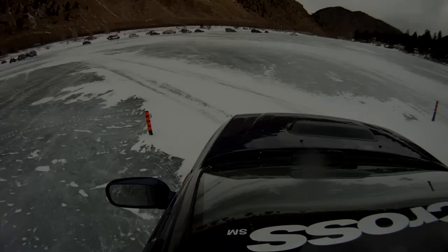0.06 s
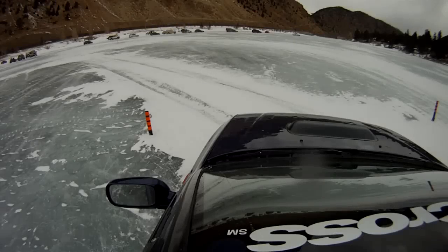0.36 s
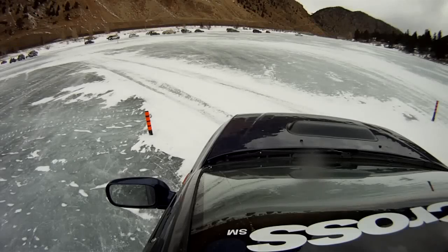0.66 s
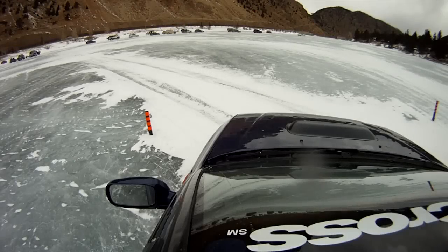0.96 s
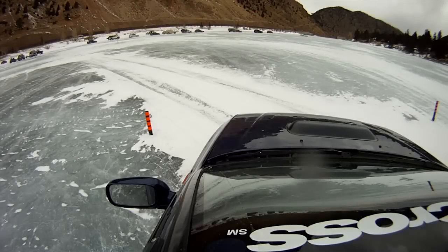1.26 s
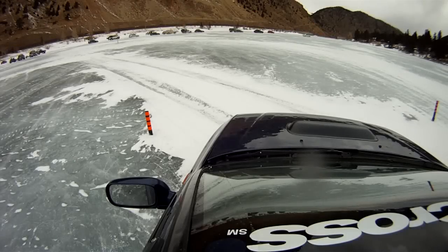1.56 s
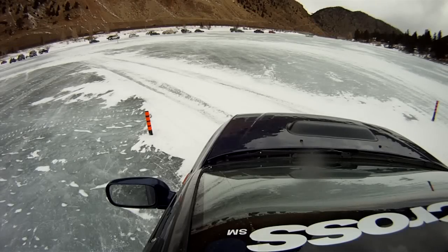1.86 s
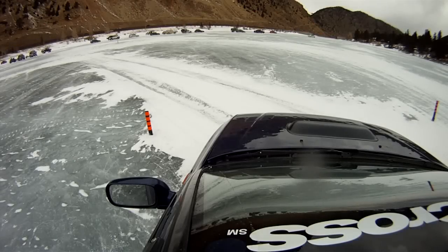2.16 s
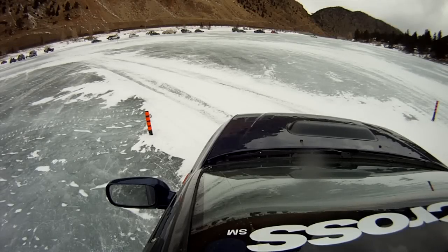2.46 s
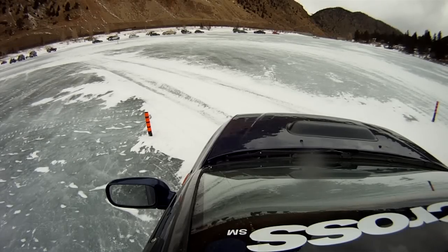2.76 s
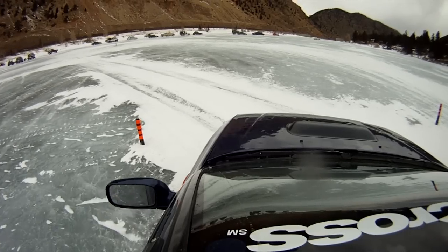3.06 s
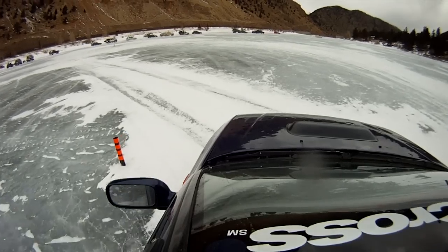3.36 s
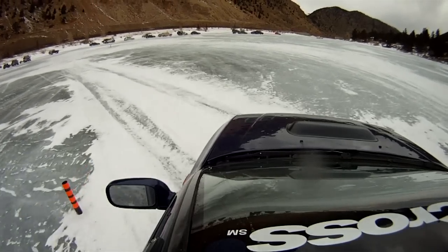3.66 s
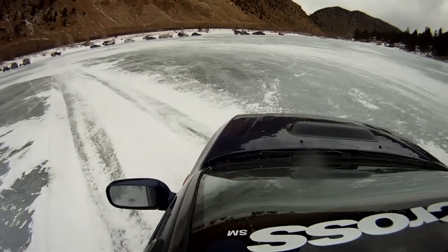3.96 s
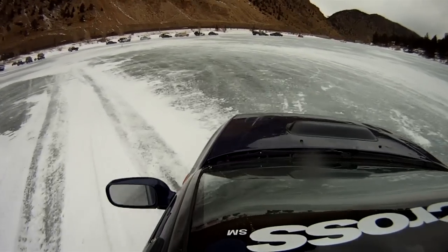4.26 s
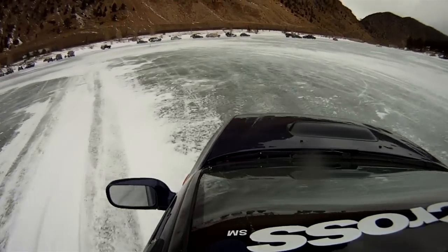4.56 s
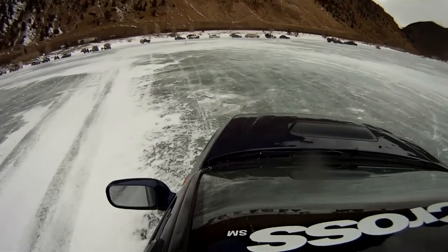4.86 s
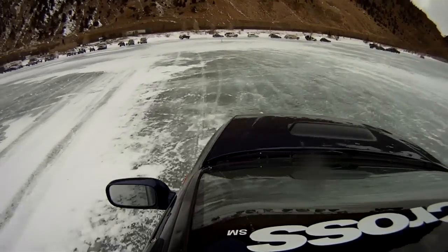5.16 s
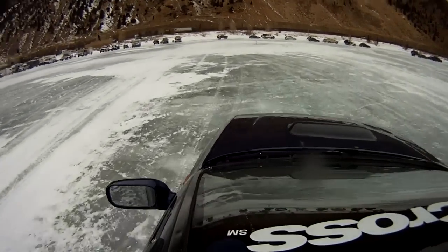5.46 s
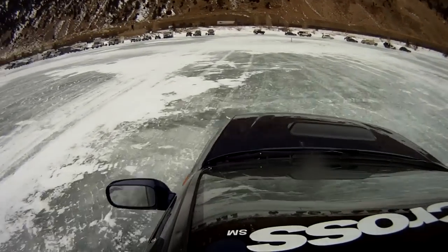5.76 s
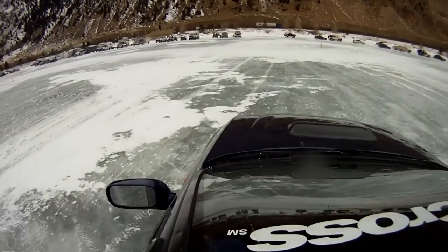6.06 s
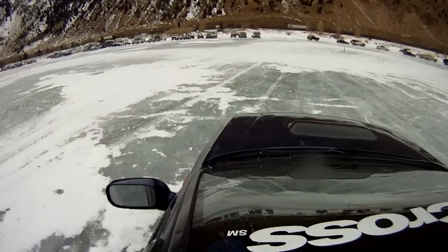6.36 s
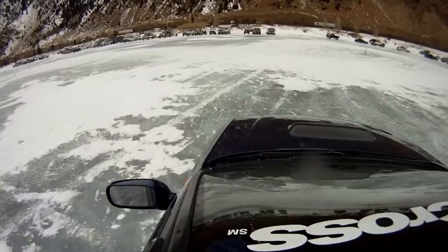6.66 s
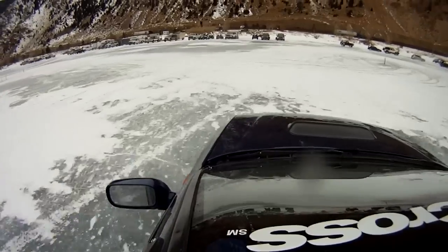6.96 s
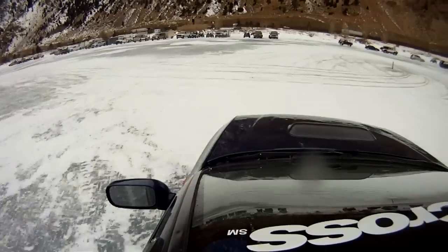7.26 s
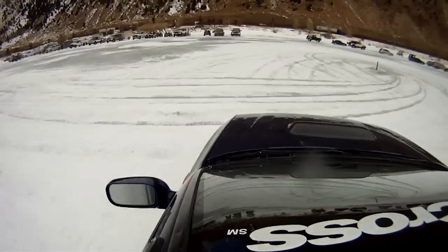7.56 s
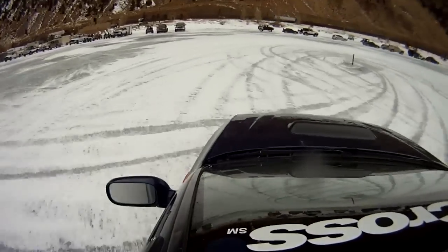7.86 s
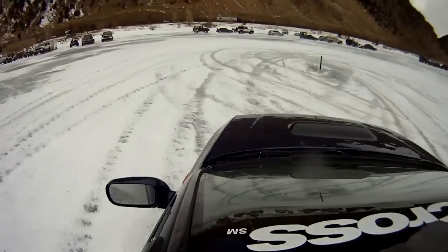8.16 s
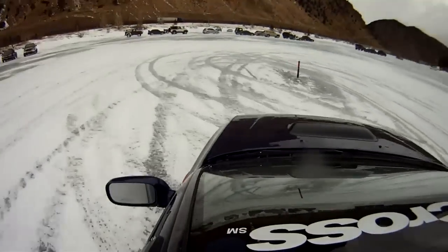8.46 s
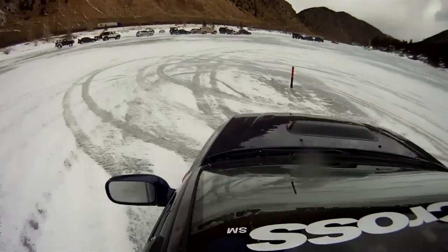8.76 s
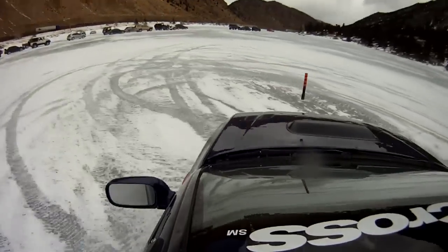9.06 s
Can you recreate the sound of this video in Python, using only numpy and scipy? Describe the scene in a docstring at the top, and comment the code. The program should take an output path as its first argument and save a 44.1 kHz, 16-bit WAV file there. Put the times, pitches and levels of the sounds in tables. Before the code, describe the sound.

A car idles with a quiet low hum, faint hiss and very faint high chirps, with a dab of throttle at about 0.7 seconds. From 2 seconds the revs climb, and near 2.7 the car pulls away, much louder, with deep rumble, drumming body panels and wheel thuds around 3 seconds. Tyres hiss and crunch over ice. The engine growls, changes up at about 5.5 seconds and pulls again around 7. Between 3.5 and 7.5 seconds the sliding tyres rasp and give several short, wavering squeals. The microphone is in a loose plastic case mounted outside the car, which adds a buzzing chatter, patchy from 3 seconds and continuous from 5, with a thin high sizzle. Sharp plastic knocks come at 6.5 seconds and hardest at 7.8, followed by a run of lighter clacks as the car rumbles on over rutted snow until about 9.3 seconds.

```python
"""A car idles on a frozen lake, pulls away, changes up and drifts over ice and rutted snow.
Its engine hums in orders of the crankshaft, the body panels drum and the wheels thud over humps.
The tyres hiss and crunch as they roll, and scrape and squeal as they slip. It is all heard from a
plastic case on an arm outside the car: the arm sways with a deep rumble, and the loose case
chatters at each swing and knocks on the ruts."""
import sys
import numpy as np
from scipy import signal
from scipy.fft import rfft, irfft, next_fast_len
from scipy.io import wavfile
from scipy.ndimage import uniform_filter1d

SR = 44100
rng = np.random.default_rng(int(sys.argv[2]) if len(sys.argv) > 2 else 0)


def wav_out(sig):
    """Save sig, one row per channel (or a flat mono array), as 16-bit PCM at SR to the path in sys.argv[1]."""
    wavfile.write(sys.argv[1], SR, np.round(np.clip(np.atleast_2d(sig).T, -1, 1) * 32767).astype(np.int16))


N = 410571
TIME = np.arange(N) / SR
CREEP_S, CREEP_RISE_S = 2.01, 0.98  # the car starts to roll
LAUNCH_S, LAUNCH_RISE_S = 2.703, 0.3  # the tyres bite and it lurches away


# Rev curve: time_s, crankshaft_hz
REVS = [(0, 23.8), (.45, 23.9), (.7, 32), (1.65, 21.3), (2.2, 35.3), (2.8, 41.5), (3.3, 36.97),
        (3.7, 38.66), (4.05, 35.51), (4.5, 35.3), (4.85, 36.6), (5.35, 40.4), (5.55, 33.4), (5.9, 34.75),
        (6.72, 44.2), (7.33, 44.3), (8.3, 38), (9.31, 43.2)]
# Engine tone in each gear: crankshaft_multiple, low_gear_db, next_gear_db
ENGINE_ORDERS = [(2, -36, -42), (3, -42, -36), (4, -37.5, -34), (5, -63, -46), (6, -42.5, -72),
                 (8, -44, -58), (10, -56.5, -62), (12, -53, -70.5), (13, -49, -85), (14, -80, -84),
                 (15, -55, -79), (16, -53.5, -58), (17, -58, -59), (20, -58, -66), (21, -60, -55.5),
                 (24, -86, -56.5), (28, -64.5, -53), (29, -78, -49), (33, -70, -55), (34, -70, -51),
                 (40, -55, -68)]
# One pull under throttle per gear: middle_s, length_s, engine_boost_db, extra_growl_db
PULLS = [(4.55, 2.76, 3, 13), (7.03, 2.1, 3.5, 12)]

def engine(blip_db, shift_s=5.45, coasting_db=-9):
    """Four cylinders through the body: orders of an unsteady crankshaft, recoloured by the gear."""
    crank_hz, = curves(REVS)
    pull_db, growl_db = swells(PULLS)
    crank_angle = 2 * np.pi * np.cumsum(crank_hz * (1 + .004 * walk(25))) / SR
    next_gear = ramp(shift_s - .05, .1)
    load = undb(coasting_db + growl_db)
    hum = np.zeros(N)
    for multiple, low_db, next_db in ENGINE_ORDERS:
        strength = undb(low_db) * (1 - next_gear) + undb(next_db) * next_gear
        if multiple > 5:  # growl and whine rise with load
            strength *= load
        flutter = 1 + 0.3 * walk(36)
        hum += strength * flutter * np.sin(round(multiple) * crank_angle + 2 * np.pi * rng.random())
    level_db = creeping(idle_db=-33, drive_db=-5) + pull_db + 1.5 * blip_db
    return np.sqrt(2) * hum * undb(level_db)


# Boom of the car body: frequency_hz, gain_db
PANEL_EQ = [(40, -29), (65, -8), (98, -7.5), (117, 1), (131, 5.5), (143, 2), (160, -16.5), (193, 1),
            (232, -2), (258, -14), (300, -26.5), (380, -31.5), (700, -59.5)]

def panels(drum_db):
    """Road and engine drum the body panels in two broad resonances."""
    return even(colour(noise(), PANEL_EQ), span_s=0.1) * undb(drum_db)


# Sub-bass jolts from the ground: frequency_hz, gain_db
JOLT_EQ = [(12, -36), (22, -7.5), (33, 11), (44, 7), (58, 3), (75, -2.5), (100, -20), (170, -54)]

def arm(rock_db, resonance_hz=31.2, lead_s=0.026, growth_db_per_s=0.47):
    """The mounting arm swings near its slow resonance, pushed out of step by jolts from the ground."""
    swing_hz = resonance_hz * (1 + .09 * walk(16))
    swing = np.sqrt(2) * np.sin(2 * np.pi * np.cumsum(swing_hz) / SR) * (1 + 0.55 * walk(27))
    rolling = .25 + 0.715 * ramp(LAUNCH_S, LAUNCH_RISE_S)
    jolts = rolling * unit(colour(noise(), JOLT_EQ))
    early_rock_db = np.interp(TIME + lead_s, TIME, rock_db)  # the arm rocks before the panels answer
    sway_db = launching(idle_db=-43.5, drive_db=-19 + growth_db_per_s * (TIME - LAUNCH_S))
    return even(swing + jolts, span_s=0.13) * undb(sway_db + early_rock_db)


def suspension(jolt_db):
    """The wheels thud as they take up the drive and drop into ruts."""
    thuds = colour(noise(), [(35, -25), (55, 5), (75, -3), (95, -1.5), (140, -34.5), (400, -65)])
    return even(thuds, span_s=0.13) * undb(launching(idle_db=-52.5, drive_db=-32.5) + jolt_db)


# Hardest hits of the case on its mount: start_s, level_db
KNOCKS = [(3.060, -22), (3.366, -21.5), (4.847, -24.5), (5.404, -20), (5.903, -29), (6.508, -11.5),
          (6.535, -13.5), (6.604, -17.5), (6.639, -23.5), (7.793, -2.5), (7.830, -19.5), (7.866, -24),
          (7.899, -18.5), (7.967, -13), (8.000, -10.5), (8.031, -18.5), (8.063, -20.5), (8.112, -21),
          (8.260, -22.5), (8.406, -20), (8.429, -18), (8.442, -17.5), (8.480, -23), (8.568, -24),
          (8.737, -22), (8.762, -16.5), (8.910, -23.5), (9.113, -18.5), (9.141, -20)]
# Plastic ring of the case: pitch_hz, level_db, t60_s
CASE_MODES = [(747, -6.5, 0.16), (882, -3.5, 0.096), (1040, -36, 0.017), (1260, 8, 0.071),
              (1624, 11, 0.027), (1903, 9.5, 0.013), (2310, -1.5, 0.025), (2640, -10.5, 0.033),
              (3500, -12, 0.017), (5060, -15, 0.0017)]
# What the small shell radiates of a knock: frequency_hz, gain_db
SHELL_EQ = [(250, -14), (480, -19), (720, -2), (1250, -4), (1650, 0.5), (1900, -4), (2650, 4), (3500, 1.5),
            (4200, -4.5), (7500, -7.5), (10000, -1), (11700, -7), (12600, -7), (13500, -5)]

def knocks(taps_from_s=5.8, tap_db=-28, trim_db=-17):
    """Ruts slam the case on its mount: brief contacts ring its modes under a sharp crack."""
    t = np.arange(int(.06 * SR)) / SR
    hits = np.zeros(N + len(t))
    # lighter taps come by chance once the car is fast
    taps = [(taps_from_s + when * (TIME[-1] - taps_from_s), tap_db + 2 * force)
            for when, force in rng.random(size=(9, 2))]
    for start_s, level_db in taps + list(KNOCKS):
        modes = np.zeros(len(t))
        for hz, db, t60_s in CASE_MODES:
            detune, spread = rng.standard_normal(2)
            decay = undb(db + 1.5 * spread - 60 * t / t60_s)
            modes += decay * np.sin(2 * np.pi * hz * (1 + 0.02 * detune) * t)
        contacts = .2 * rng.standard_normal(len(t)) * np.exp(-t / .0023)
        contacts[0] = 1  # one firm blow, then a brief scuffing
        ring = unit(signal.fftconvolve(modes, contacts)[:len(t)] * np.exp(-t / .014))
        crack = unit(rng.standard_normal(len(t)) * np.exp(-t / .0038))
        start = int(start_s * SR)
        hits[start:start + len(t)] += undb(level_db + trim_db) * (ring + undb(-7) * crack)
    return colour(hits[:N], SHELL_EQ)


# Rough patches that rattle the case: middle_s, length_s, level_db
ROUGH_PATCHES = [(2.953, 0.047, -46), (3.113, 0.21, -43.5), (3.382, 0.071, -44), (3.489, 0.077, -46),
                 (3.79, 0.19, -40), (3.923, 0.12, -42), (4.195, 0.059, -40), (4.479, .09, -39),
                 (4.61, 0.093, -42.5), (4.852, .16, -42), (5.32, .4, -47)]

def rough_ground(fast_from_s=4.95, fast_db=-44.5, smooth_ice_db=-65.5):
    """How hard the ground rattles the case: single patches at first, then all the time, in clumps."""
    clumps_db = 2.5 * np.clip(walk(17), -2, 1)
    at_speed = ramp(fast_from_s, 0.081) * undb(fast_db + clumps_db - 1.5 * on_snow())
    smooth_ice = ramp(LAUNCH_S, LAUNCH_RISE_S) * undb(smooth_ice_db)
    return np.hypot(bursts(ROUGH_PATCHES), at_speed) + smooth_ice


# Bright plastic buzz: frequency_hz, gain_db
CHATTER_EQ = [(400, -29), (900, -4), (1700, 22.5), (2600, 15), (3500, 14), (5000, 11.5), (8000, 9),
              (15000, -8.5)]

def chatter(shake):
    """At each end of a swing the loose case rubs its seat and buzzes for a few milliseconds."""
    swing = np.abs(even(shake, span_s=0.61))
    ends = signal.find_peaks(swing, distance=int(.011 * SR))[0]
    slaps = np.zeros(N)
    slaps[ends] = np.clip(swing[ends] - .7, 0, 1.5) * undb(2 * rng.standard_normal(len(ends)))
    t = np.arange(int(.02 * SR)) / SR
    contact = signal.fftconvolve(slaps, t * np.exp(-t / .0013))[:N]
    return unit(colour(contact * noise(), CHATTER_EQ))


# Rolling tread: frequency_hz, gain_db
TYRE_EQ = [(200, 2), (400, -5.5), (520, 0.5), (620, -7.5), (850, -2.5), (980, -6), (1270, 2.5), (1500, 0),
           (2000, -3.5), (2650, -8.5), (3100, -16), (4200, -21.5), (7500, -33), (15000, -44)]

def tyres(idle_db=-51, drive_db=-39, snow_db=-3):
    """Tread hisses over ice, with snow grains cracking under it; a faint rush remains at idle."""
    speed = ramp(CREEP_S, CREEP_RISE_S) ** 1.94
    rolling = 0.18 + 0.73 * speed
    hiss = noise() * undb(4.5 * rolling * walk(45))
    crunch = rolling * unit(grains(900, spread_db=5.5))
    level_db = idle_db + (drive_db - idle_db) * speed + snow_db * on_snow()
    waver_db = 1.284 * rolling * walk(7)
    return unit(colour(hiss + undb(-2.5) * crunch, TYRE_EQ)) * undb(level_db + waver_db)


# Wheelspins and slides: middle_s, length_s, level_db
SCRAPES = [(0.696, 0.089, -53), (3.334, 0.42, -50), (3.632, 0.49, -39.5), (4.722, 0.32, -39),
           (5.265, 0.62, -40), (6.2, 0.39, -41.5), (6.838, 0.27, -52), (7.35, 0.14, -34)]
# Rasp of tread on ice: frequency_hz, gain_db
SCRAPE_EQ = [(300, -2), (700, -2), (1000, -1), (1350, 5.5), (1800, -2.5), (2400, -5), (3500, -8.5),
             (4500, -16.5), (15000, -15)]

def scrapes():
    """Slipping tread rasps over the ice, grain by grain."""
    rasp = noise() * undb(3 * walk(110)) + unit(grains(1500, spread_db=5))
    return unit(colour(rasp, SCRAPE_EQ)) * bursts(SCRAPES)


# Short squeals of rubber on ice: middle_s, length_s, pitch_hz, level_db
SQUEALS = [(3.703, 0.17, 1270, -39.5), (4.337, 0.17, 1332, -41), (4.716, 0.39, 2053, -38.5),
           (5.178, 0.089, 1274, -34), (5.6, 0.33, 1474, -38.5), (6.83, 0.36, 1510, -37.5),
           (7.301, .5, 1090, -41.5)]

def squeals():
    """Slipping tread sings briefly, with a wavering, grainy tone."""
    tones = np.zeros(N)
    for middle_s, length_s, hz, db in SQUEALS:
        phase = 2 * np.pi * np.cumsum(hz * (1 + 0.032 * walk(170))) / SR
        tones += undb(db) * swell(middle_s, length_s) * (1 + 0.36 * walk(60)) * np.sin(phase)
    return tones


# Soft snow between stretches of bare ice: start_s, end_s
SNOW_STRETCHES = [(3.75, 3.84), (7.45, 9.31)]

def on_snow(edge_s=0.13):
    """The ground under the tyres: 0 on ice, fading towards 1 on snow."""
    return sum(ramp(start_s, edge_s) - ramp(end_s, edge_s) for start_s, end_s in SNOW_STRETCHES)


# Thin high sizzle: frequency_hz, gain_db
SIZZLE_EQ = [(5000, -30), (8300, -17), (9700, 0), (11600, -1), (11780, 15), (12200, 15), (12380, -2),
             (14000, -1), (15300, -10)]

def sizzle(drum_db):
    """A thin high sizzle with a bright band near 12 kHz, following the drumming's level."""
    return unit(colour(noise() * undb(3.2 * walk(70)), SIZZLE_EQ)) * undb(drum_db - 24.5)


# Faint chirps at idle: pitch_hz, level_db
CHIRPS = [(3570, -74), (8450, -73.5)]

def idle_chirps(fade_from_s=1.5):
    """On-and-off chirping while the car stands, perhaps a belt."""
    gate = np.clip(walk(22.2) + .5, 0, 2) * (1 - ramp(fade_from_s, 0.31))
    return gate * sum(undb(db) * np.sin(2 * np.pi * np.cumsum(hz + 110 * walk(400)) / SR)
                      for hz, db in CHIRPS)


def idle_tick():
    """One small dry tick before the car moves."""
    bright = unit(colour(noise(), [(2000, -28), (3300, 4), (8000, -8), (11000, -20)]))
    return bright * swell(middle_s=1.64, length_s=.008) * undb(-54)


def air():
    """Steady faint hiss under everything."""
    eq = [(300, 8.5), (800, 19), (2500, -20.5), (3500, 3.5), (4300, -3), (9000, -3), (15000, -2.5)]
    return unit(colour(noise(), eq)) * undb(-59.5)


def stereo_width(roughness):
    """Faint, uneven left-right noise that swells with the chatter, over a thin steady hiss."""
    width_eq = [(30, 6.5), (200, 4), (500, 12), (900, 7), (1500, -7.5), (5000, -13.5), (15000, -29)]
    uneven = noise() * undb(10 * np.clip(walk(12), -2, 1))
    swelling = roughness * unit(colour(uneven, width_eq))
    thin_hiss = unit(colour(noise(), [(1500, -14), (3500, 0), (7000, -4), (10000, -26)]))
    return swelling * undb(-14.5) + thin_hiss * undb(-85.5)


def undb(db):
    """Decibels to gain."""
    return 10 ** (np.asarray(db) / 20)


def unit(x):
    """Scale to rms 1."""
    return x / np.sqrt(np.mean(x ** 2))


def even(x, span_s):
    """Hold a vibration near rms 1 over spans longer than span_s."""
    return x / np.sqrt(uniform_filter1d(x ** 2, int(span_s * SR) + 1) + 1e-9)


def colour(x, eq):
    """Minimum-phase EQ through (frequency_hz, gain_db) points."""
    size = next_fast_len(2 * len(x))
    hz, db = np.transpose(eq)
    log_hz = np.log(np.fft.rfftfreq(size, 1 / SR) + 1)
    log_gain = np.log(undb(np.interp(log_hz, np.log(hz), db)))
    cepstrum = irfft(log_gain, size)
    cepstrum[1:size // 2] *= 2  # folding the cepstrum makes the filter causal
    cepstrum[size // 2 + 1:] = 0
    return irfft(rfft(x, size) * np.exp(rfft(cepstrum)), size)[:len(x)]


def noise():
    """White noise of rms 1."""
    return rng.standard_normal(N)


def walk(rate_hz):
    """Random drift of spread near 1, gliding to rate_hz new values a second."""
    knots = rng.standard_normal(4096)
    return np.interp(TIME * rate_hz, np.arange(len(knots)), knots)


def grains(rate_hz, spread_db):
    """Random clicks of widely differing size."""
    clicks = (rng.random(N) < rate_hz / SR) * np.sign(noise())
    return clicks * undb(spread_db * np.clip(noise(), -2, 2))


def curves(table):
    """Every column of a timed table, sample by sample."""
    time_s, *columns = np.transpose(table)
    return [np.interp(TIME, time_s, column) for column in columns]


def ramp(start_s, length_s):
    """A straight rise from 0 to 1."""
    return np.clip((TIME - start_s) / length_s, 0, 1)


def swell(middle_s, length_s):
    """A rounded rise to 1 and back."""
    return np.sin(np.pi * np.clip((TIME - middle_s) / length_s + .5, 0, 1))


def swells(table):
    """Summed swells from rows of (middle_s, length_s, sizes), one curve per column of sizes."""
    return sum(np.outer(sizes, swell(middle_s, length_s)) for middle_s, length_s, *sizes in table)


def bursts(table):
    """A gain envelope from rows of (middle_s, length_s, level_db)."""
    return sum(undb(db) * swell(middle_s, length_s) for middle_s, length_s, db in table)


def creeping(idle_db, drive_db):
    """A level that climbs gradually as the car starts to roll."""
    return idle_db + (drive_db - idle_db) * ramp(CREEP_S, CREEP_RISE_S)


def launching(idle_db, drive_db):
    """A level that jumps as the tyres bite."""
    return idle_db + (drive_db - idle_db) * ramp(LAUNCH_S, LAUNCH_RISE_S)


# Dabs of throttle, the last at the launch: middle_s, length_s, drum_boost_db, sway_boost_db
THROTTLE_BLIPS = [(.7, 0.41, 8.5, 13.5), (1.88, 0.58, 7, 2.5), (2.42, 0.51, 3.5, 4), (2.93, 0.18, 1, 7)]
# Humps under the wheels: middle_s, length_s, drum_change_db, thud_change_db
HUMPS = [(3.06, 0.46, 1, 14), (3.36, 0.24, 2, 9.5), (4.67, 0.28, 4, -5), (5.21, 0.2, 8, 3),
         (5.55, 0.28, 4, 8), (6.15, 0.24, -3.5, 8.5), (6.48, 0.15, -1, 10.5), (6.85, 0.27, 4, -9),
         (7.62, 0.21, 6, 4), (8.25, 0.38, 1, 10), (9.02, 0.092, 7.5, 11)]

def scene():
    """The mix: close to mono, the two channels differing only by a faint, uneven side noise."""
    blip_db, rock_db = swells(THROTTLE_BLIPS)
    hump_db, jolt_db = swells(HUMPS)
    drum_db = creeping(idle_db=-45.5, drive_db=-25.5) + blip_db + hump_db - 3.5 * on_snow()
    shake = arm(rock_db) + panels(drum_db) + suspension(jolt_db + blip_db)
    roughness = rough_ground()
    highs = roughness * chatter(shake) + sizzle(drum_db) + knocks()
    car = engine(blip_db) + tyres() + scrapes() + squeals() + idle_chirps() + idle_tick()
    mid = car + shake + highs + air()
    side = stereo_width(roughness)
    return np.array([mid + side, mid - side])


# Boxy treble of the closed case: frequency_hz, gain_db
CASE_EQ = [(2700, 0), (3100, -2), (3550, 3), (4000, -4), (5300, 3), (6000, -14), (6800, 2), (8000, -3),
           (10400, 4), (11450, -7), (12650, -7), (13500, 5), (15000, -1)]

def record(dry):
    """The closed case colours the treble, then a steep low-pass cuts the top."""
    boxed = np.array([colour(channel, CASE_EQ) for channel in dry])
    top_cut = signal.ellip(10, .2, 80, 15500, fs=SR, output="sos")
    return signal.sosfilt(top_cut, boxed)


dry = scene()
out = record(dry)
wav_out(out)
```